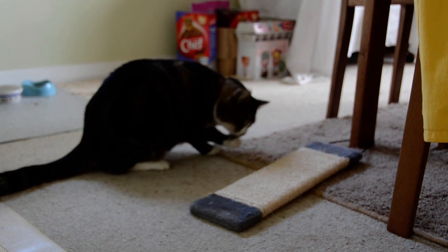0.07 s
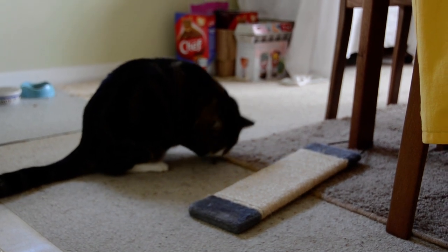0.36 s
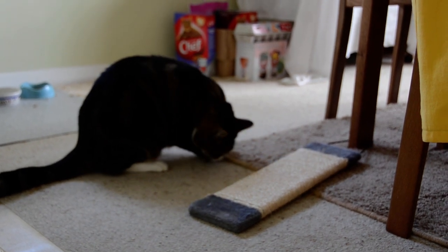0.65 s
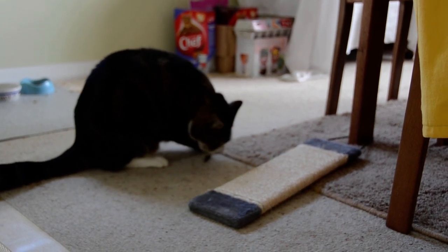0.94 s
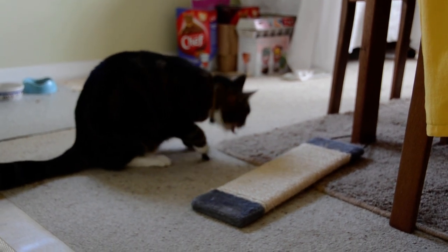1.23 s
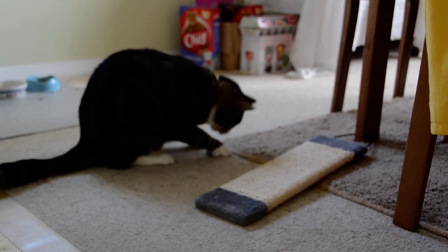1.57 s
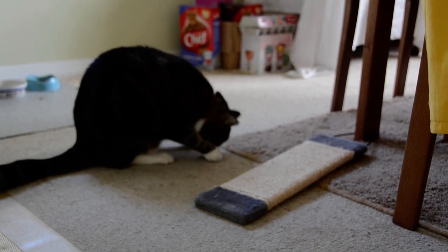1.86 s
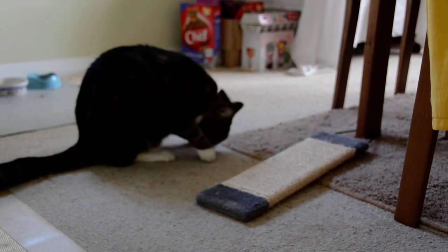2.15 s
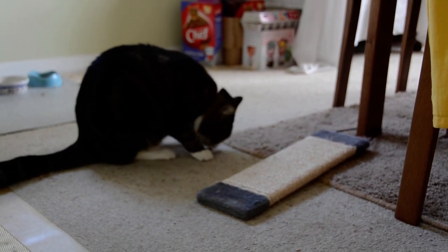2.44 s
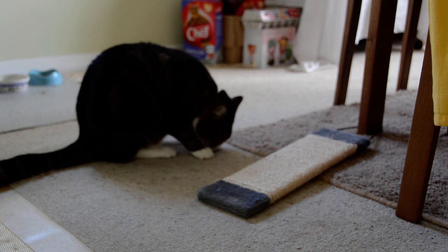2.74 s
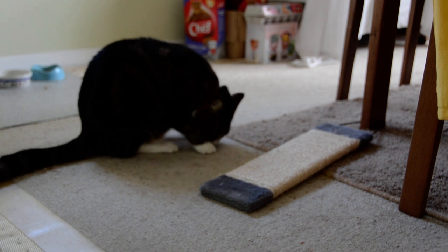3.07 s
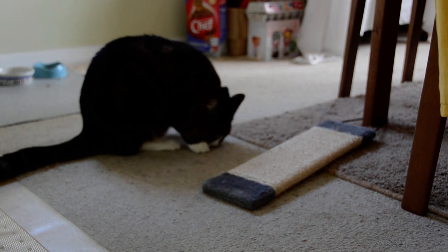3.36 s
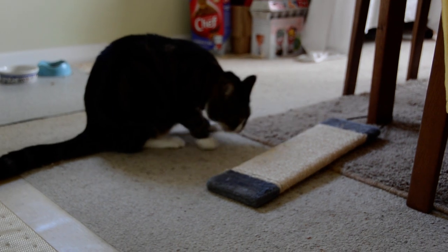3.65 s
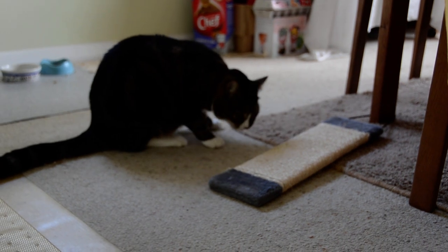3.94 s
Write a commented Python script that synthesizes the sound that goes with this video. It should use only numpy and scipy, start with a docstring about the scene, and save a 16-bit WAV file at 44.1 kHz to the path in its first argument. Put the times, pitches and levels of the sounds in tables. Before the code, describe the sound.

Harsh, stuttering cicada buzzing in a quiet room as a cat paws at the insect.

```python
"""A cicada screeches in alarm on a carpet while a cat paws at it, in a quiet furnished room.
Its tymbal buckles about 95 times a second, two or three ribs at a time, and each click excites the
resonances of the hollow body. The pulse train comes in long buzzes and short stuttering bursts, thinner
and brighter when the insect is loose. Paws knock and brush softly; ventilation and a faint appliance
hum form the background."""
import sys
import numpy as np
from scipy import signal
from scipy.fft import rfft, irfft
from scipy.io import wavfile

SR = 44100
rng = np.random.default_rng(int(sys.argv[2]) if len(sys.argv) > 2 else 0)


def wav_record(signal):
    """Record a signal, one row per channel, as 16-bit PCM in the file named by sys.argv[1]."""
    frames = np.transpose(np.atleast_2d(signal))
    bounded = np.clip(frames, -1, 1)
    # unit amplitude maps onto the largest positive 16-bit level
    quanta = np.round(bounded * 32767).astype(np.int16)
    wavfile.write(sys.argv[1], SR, quanta)


N = 176400
LEAD = SR // 10  # samples before time zero, so the room is already ringing
TIME = np.arange(-LEAD, N) / SR
CLICK_SAMPLES = 512


def from_db(db):
    """The decibel scale: amplitude grows tenfold for every 20 dB."""
    return 10 ** (np.asarray(db) / 20)


def curve(rows):
    """Linear interpolation of (time, value) points at every sample."""
    return np.interp(TIME, *np.transpose(rows))


# Spectrum of the ventilation: (frequency [Hz], relative spectral level [dB])
AIR_SPECTRUM = [(20, -17), (30, -24), (42, 5.5), (80, 1), (150, 1), (300, 0), (600, -2), (950, -5),
                (1180, -1), (1700, -9.5), (2600, -7), (2780, -2.5), (2930, 10.5), (3250, -8), (4600, 5),
                (7500, -6), (10000, -29), (13000, -42), (15500, -18)]
def ventilation(rms_db=-51.5, top_hz=14000):
    """Spectral shaping: white noise becomes a steady rush of air with a narrow hiss near 3 kHz."""
    hz, db = np.transpose(AIR_SPECTRUM)
    freqs = np.maximum(np.fft.rfftfreq(len(TIME), 1 / SR), 1)
    colour = from_db(np.interp(np.log(freqs), np.log(hz), db))
    air = irfft(rfft(rng.standard_normal(len(TIME))) * colour, len(TIME))
    air = signal.sosfilt(signal.butter(6, top_hz, fs=SR, output="sos"), air)
    return from_db(rms_db) * air / air.std()


# Hum tones of the appliance: (frequency [Hz], rms level [dB])
HUM_TONES = [(247.6, -74.5), (398.4, -73.5), (791.3, -76), (1141, -76)]
def appliance(whine_hz=15618, whine_db=-81.5):
    """A line spectrum: steady sinusoids add up to a hum and a thin electrical whine."""
    return sum(np.sqrt(2) * from_db(db) * np.sin(2 * np.pi * (hz * TIME + rng.random()))
               for hz, db in [*HUM_TONES, (whine_hz, whine_db)])


# Paws brushing the carpet: (centre time [s], duration [s], level [dB])
PAW_SCUFFS = [(0.687, 0.066, -63), (.99, .04, -65), (1.47, 0.066, -59.5)]
def paw_scuffs(band_hz=(900, 2660)):
    """Friction noise: rubbed carpet fibres give a band of hiss in short Gaussian swells."""
    band = signal.butter(2, band_hz, "band", fs=SR, output="sos")
    fibres = signal.sosfilt(band, rng.standard_normal(len(TIME)))
    swells = sum(from_db(db) * np.exp(-2 * ((TIME - centre) / duration) ** 2)
                 for centre, duration, db in PAW_SCUFFS)
    return fibres / fibres.std() * swells


# Soft impacts of the paws: (time [s], frequency [Hz], level [dB], 60 dB decay time [s])
PAW_KNOCKS = [(.375, 492, -50.5, .12), (1.37, 42.7, -51, 0.21), (2.5, 110, -47.5, 0.12)]
def paw_knocks():
    """Damped oscillation: each cushioned knock builds over two cycles and decays exponentially."""
    out = 0
    for start, hz, db, t60 in PAW_KNOCKS:
        age = np.maximum(TIME - start, 0)
        attack = np.minimum(age * hz / 2, 1)
        out += attack * from_db(db - 60 * age / t60) * np.sin(2 * np.pi * hz * age)
    return out


def reflections(sound, t60_s, delay_s):
    """Diffuse reverberation: convolution with a decaying noise tail of unit energy."""
    t = np.arange(SR // 2) / SR
    tail = rng.standard_normal(len(t)) * from_db(-60 * t / t60_s) * (t > delay_s)
    return signal.fftconvolve(sound, tail / np.linalg.norm(tail))[:len(sound)]


def minimum_phase(spectra_db):
    """Minimum phase: folding the cepstrum gives the most compact click for each spectrum."""
    cepstrum = irfft(np.log(from_db(spectra_db)))
    fold = 1 + np.sign(CLICK_SAMPLES / 2 - np.arange(CLICK_SAMPLES))
    fold[0] = 1
    return irfft(np.exp(rfft(cepstrum * fold)))


def resonances(modes, freqs, click_count, spread_db=1.3):
    """Modal superposition: steep-sided peaks add in power, excited a little differently by each click."""
    hz, width, db = np.transpose(modes)
    detuning = 2 * (freqs - hz[:, None]) / width[:, None]
    peaks = from_db(db[:, None]) ** 2 / (1 + detuning ** 4)
    excitation = from_db(rng.normal(0, spread_db, (click_count, len(hz)))) ** 2
    return excitation @ peaks / peaks.sum(0).mean()


# Body modes under the paw and when loose: (frequency [Hz], bandwidth [Hz], relative level [dB])
PINNED_MODES = [(2430, 940, -23.5), (3634, 630, -9), (4345, 420, 1.5), (4865, 460, 2.5), (5345, 420, -1.5),
                (6030, 280, -3.5), (6610, 400, -8), (7806, 990, -10), (9180, 300, -22), (10100, 860, -29),
                (11500, 690, -38.5)]
LOOSE_MODES = [(3450, 1120, -21), (4580, 480, -5), (5230, 480, -1.5), (6156, 270, -2.5), (7560, 560, -2),
               (8600, 840, -6), (9540, 480, -14), (10570, 1200, -18), (12000, 1600, -32)]
# How freely the insect lies: (time [s], looseness [0 pinned to 1 loose])
LOOSENESS = [(0, 0.6), (.33, 0.74), (.41, 0.16), (.7, 0), (1.45, 0), (1.58, 0.2), (1.7, .02), (3.35, 0.05),
             (3.55, 0.06), (3.72, .95), (4.0, 0.91)]
# Brightness as it turns: (time [s], spectral slope [dB/octave])
TURNING_SLOPE = [(0, -5.5), (.55, 1), (.95, 0), (1.3, -0.5), (1.6, -0.5), (2.0, -1), (2.7, -1), (3.2, -1.5),
                 (3.5, 4), (4.0, -6)]
def hollow_body(times, gains, rib_slopes, pivot_hz=4500, bounce_s=.0009, bounce_db=-9):
    """Impulse response of a resonator: each click rings the body, coloured by its rib and the posture."""
    freqs = np.maximum(np.fft.rfftfreq(CLICK_SAMPLES, 1 / SR), 20)
    looseness = np.interp(times, TIME, curve(LOOSENESS))[:, None]
    pinned = resonances(PINNED_MODES, freqs, len(times))
    loose = resonances(LOOSE_MODES, freqs, len(times))
    power = pinned ** (1 - looseness) * loose ** looseness
    slopes = rib_slopes + np.interp(times, TIME, curve(TURNING_SLOPE))
    octaves = np.log2(np.maximum(freqs / pivot_hz, .5))
    rings = minimum_phase(10 * np.log10(power) + slopes[:, None] * octaves)
    # under the paw a close reflection draws each click out
    bounce_gain = from_db(bounce_db) * (1 - looseness[:, 0])
    out = np.zeros(len(TIME) + SR)
    for delay, path_gain in ((0, 1), (bounce_s, bounce_gain)):
        onsets = np.round(times * SR).astype(int) + LEAD + round(delay * SR)
        for onset, gain, ring in zip(onsets, path_gain * gains, rings):
            out[onset:onset + CLICK_SAMPLES] += gain * ring
    return out[:len(TIME)]


# Stuttering bursts: (start [s], strokes [count], stroke rate [Hz], level [dB])
SHORT_BURSTS = [(-.06, 4, 130, -34.5), (0.0326, 4, 98, -38), (0.1023, 5, 102, -37.5), (0.189, 4, 102, -37),
                (.264, 6, 107, -37.5), (1.54, 12, 99, -37), (1.7035, 3, 99, -35.5), (1.78, 3, 99, -37.5),
                (1.852, 3, 98, -37.5), (1.919, 4, 104, -37), (1.9923, 4, 103, -36), (2.0918, 3, 105, -36),
                (2.1628, 4, 118, -35.5), (2.2482, 4, 114, -37), (2.315, 4, 97, -37), (2.39, 5, 106, -37.5),
                (2.479, 3, 105, -38), (2.5699, 3, 121, -37), (2.642, 4, 104, -41.5), (2.7285, 5, 100, -38),
                (2.807, 4, 111, -38.5), (2.8811, 3, 112, -42.5), (2.9373, 10, 105, -38.5),
                (3.0978, 2, 114, -36.5), (3.1601, 3, 104, -36.5), (3.236, 3, 122, -36.5),
                (3.317, 4, 95, -45.5), (3.428, 3, 117, -42.5)]
# Sustained buzzes: (start [s], end [s], stroke rate [Hz], ribs per stroke [count])
LONG_BUZZES = [(0.3456, .397, 97.5, 3), (0.3963, .655, 93.8, 3), (0.666, .737, 96, 3),
               (0.7392, 1.132, 91.6, 2), (1.167, 1.52, 100, 2), (3.493, 3.694, 112, 3),
               (3.701, 4.007, 99, 3)]
# Effort in the long buzzes: (time [s], level [dB])
BUZZ_EFFORT = [(.35, -41), (.42, -39), (.55, -38.5), (.64, -40), (.71, -38), (.76, -43), (1.0, -45.5),
               (1.1, -42.5), (1.17, -44.5), (1.33, -41), (1.44, -43.5), (1.5, -41), (3.5, -42),
               (3.57, -43.5), (3.68, -44.5), (3.78, -40), (4.0, -38.5)]
# Rib clicks within one stroke: (delay [s], relative level [dB], spectral slope [dB/octave])
THREE_RIB_STROKE = [(0, -4.5, 1.5), (.0019, .5, .5), (.005, 0, -.5)]
TWO_RIB_STROKE = [(0, .5, -6), (.0044, -1, 4)]
def tymbal(jitter_s=.00003, spread_db=.7):
    """Elastic buckling: each stroke snaps the ribs in turn, giving click times, gains and slopes."""
    runs, clicks = [], []
    for start, strokes, rate, db in SHORT_BURSTS:
        starts = start + np.arange(strokes) / rate
        runs.append((starts, np.full(strokes, db), rate, THREE_RIB_STROKE))
    for start, end, rate, rib_count in LONG_BUZZES:
        starts = start + np.arange(round((end - start) * rate)) / rate
        levels = np.interp(starts, TIME, curve(BUZZ_EFFORT))
        runs.append((starts, levels, rate, TWO_RIB_STROKE if rib_count == 2 else THREE_RIB_STROKE))
    for starts, levels, rate, ribs in runs:
        delays, rib_db, slopes = np.transpose(ribs)
        # the ribs share the energy of one stroke period
        shares = from_db(rib_db) / np.linalg.norm(from_db(rib_db)) * np.sqrt(SR / rate)
        for start, db in zip(starts, levels):
            stroke_time = start + rng.normal(0, jitter_s)
            times = stroke_time + delays + rng.normal(0, jitter_s, len(ribs))
            gains = shares * from_db(db + rng.normal(0, spread_db, len(ribs)))
            clicks += zip(times, gains, slopes)
    return np.transpose(clicks)


# Direct sound as the cat comes between: (time [s], gain [dB])
CAT_SHADOW = [(3.45, 0), (3.75, -3), (4.0, -2)]
def cicada(gain_db=-1.49, walls_db=-5.5):
    """Acoustic shadowing: behind the cat, less of the buzz arrives directly and more by reflection."""
    buzz = from_db(gain_db) * hollow_body(*tymbal())
    direct_gain = from_db(curve(CAT_SHADOW))
    furniture = reflections(buzz * np.sqrt(1 - direct_gain ** 2), t60_s=.049, delay_s=0)
    walls = from_db(walls_db) * reflections(buzz, t60_s=.39, delay_s=.0065)
    return buzz * direct_gain + furniture + walls


def scene():
    """Linear superposition: the pressures of cicada, cat and room add at one point."""
    mix = cicada() + paw_knocks() + paw_scuffs() + ventilation() + appliance()
    return mix[None, LEAD:]


def record(dry):
    """Band limiting: a steep elliptic low-pass removes the highest treble."""
    cutoff_hz = 15900
    return signal.sosfilt(signal.ellip(12, .1, 80, cutoff_hz, fs=SR, output="sos"), dry)


dry = scene()
out = record(dry)
wav_record(out)
```